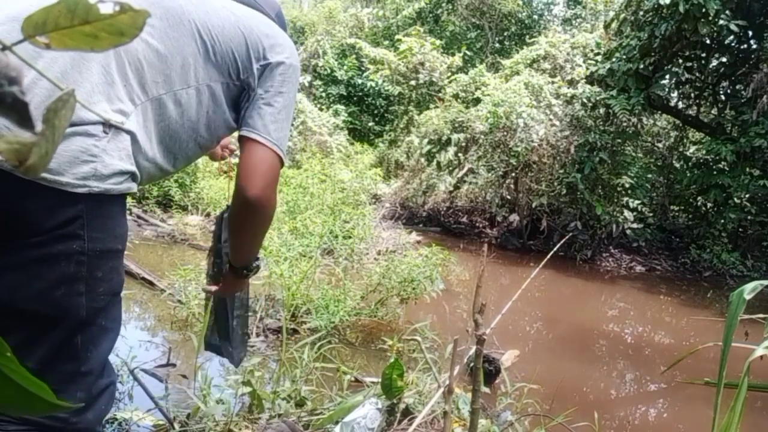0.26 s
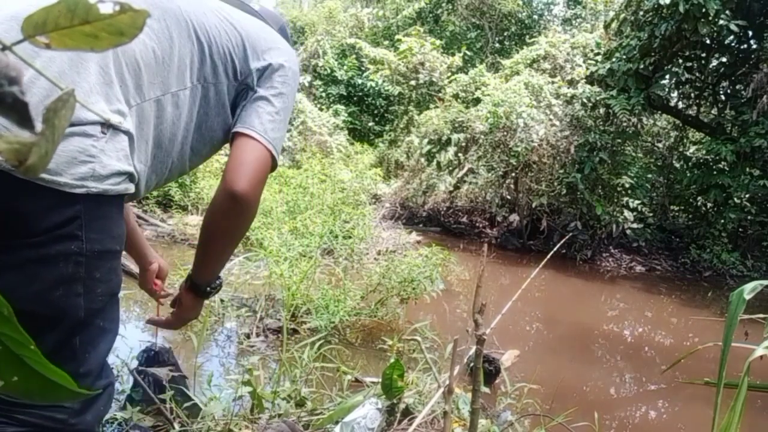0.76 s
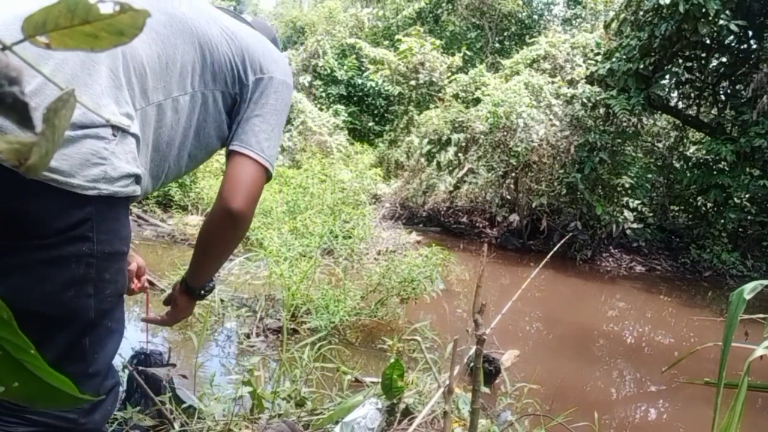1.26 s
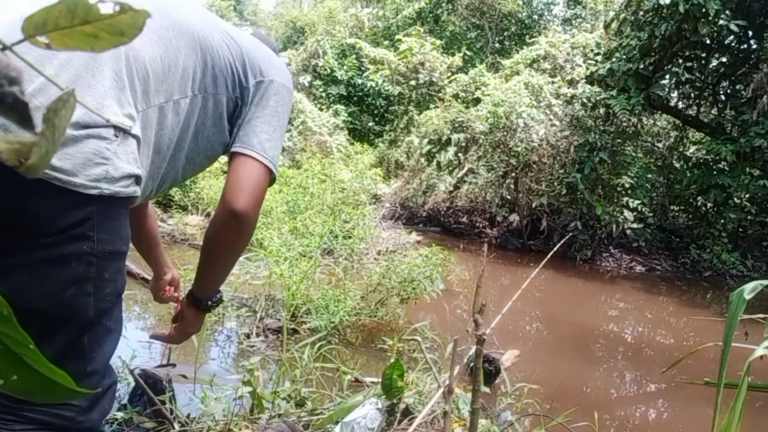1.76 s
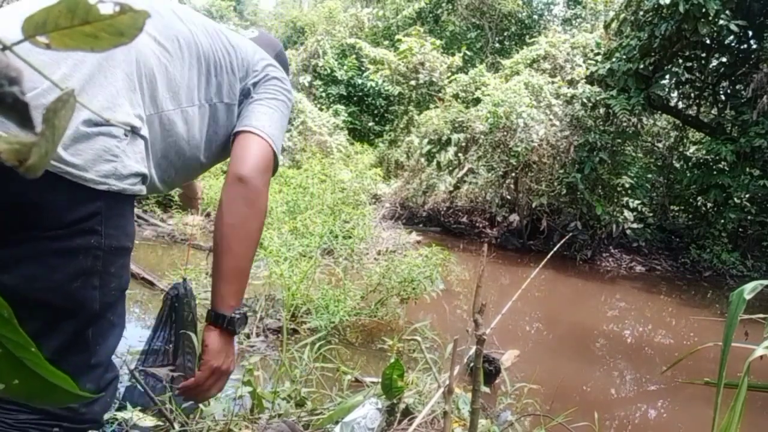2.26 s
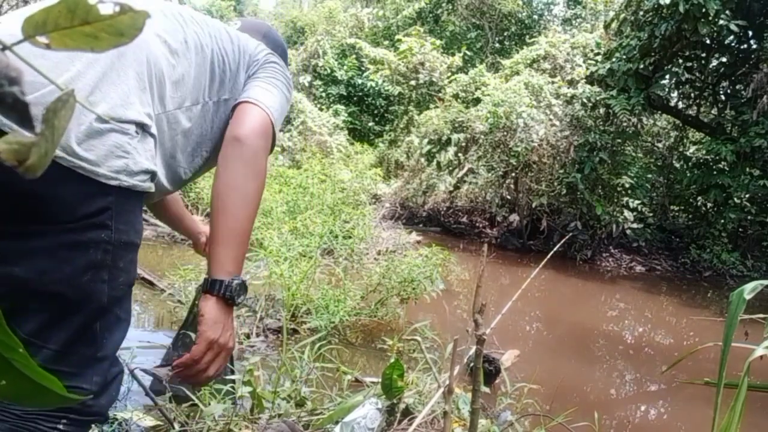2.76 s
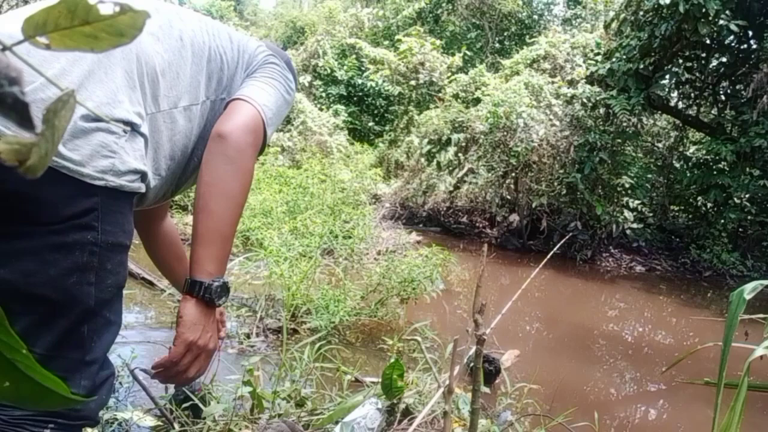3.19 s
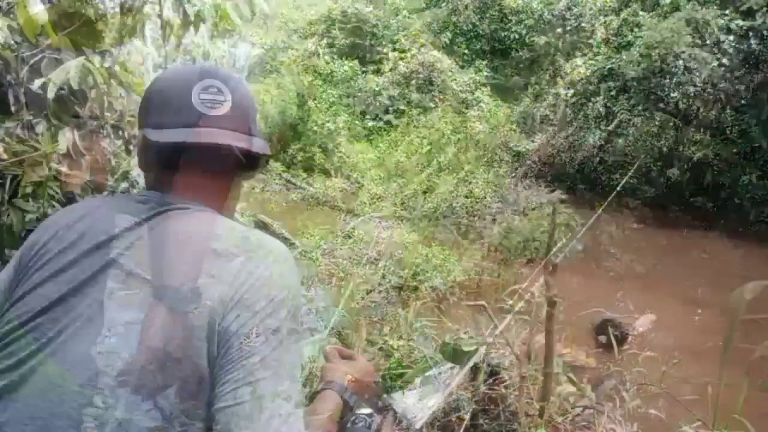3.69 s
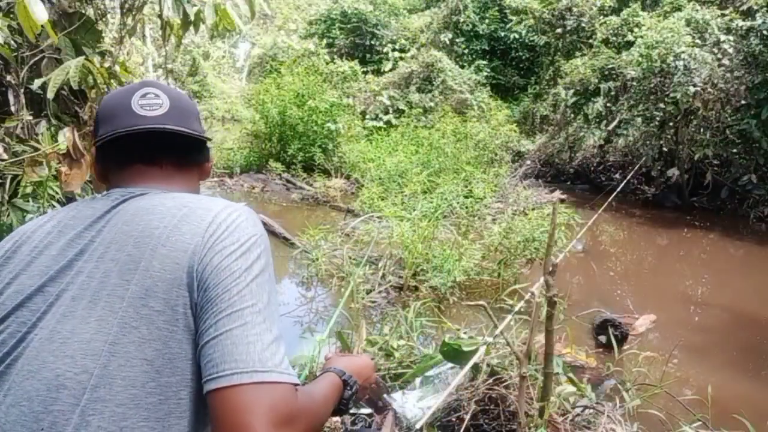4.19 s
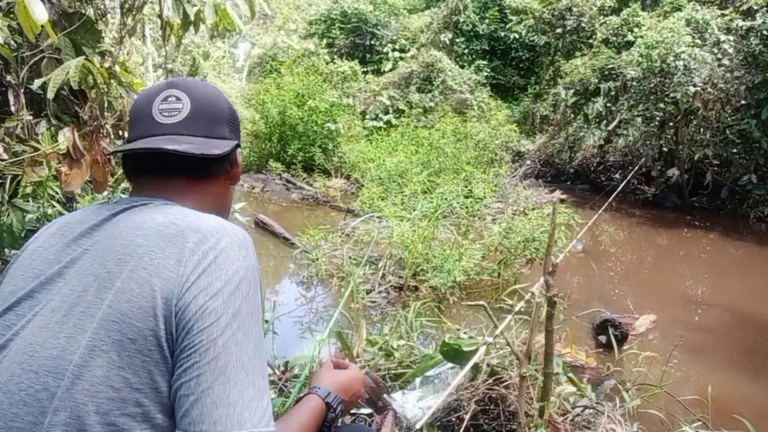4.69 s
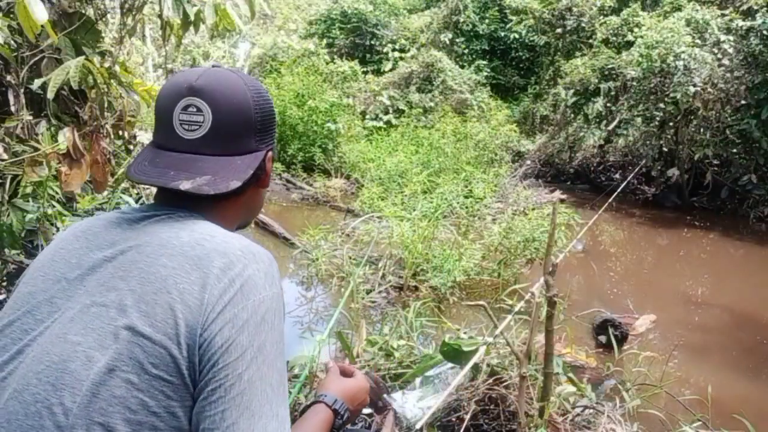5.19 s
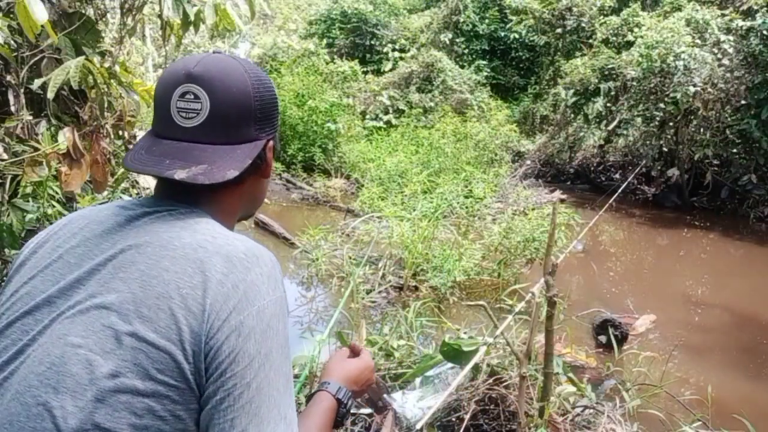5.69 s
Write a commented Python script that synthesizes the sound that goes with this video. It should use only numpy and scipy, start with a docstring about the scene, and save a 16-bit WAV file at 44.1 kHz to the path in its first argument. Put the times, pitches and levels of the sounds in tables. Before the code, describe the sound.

Steady high cicada hiss and a rasping katydid by a forest creek; a mesh trap drips, gurgles and slaps the water, then leaves rustle and a stem crackles.

```python
"""At the edge of a forest creek, close to the microphones, a mesh fish trap is dipped and lifted.
Water made of damped rings and shaped noise splashes, trickles and bubbles, with one big slap.
All round, flickering noise bands hiss as cicadas; on the left a katydid rasps two bouts of pulsed noise.
Far off a bird whistles rising sine notes, and a light breeze of low noise rumbles.
Leaves rustle in clumped grains; later come hollow gulps of fluttering tone and a crackling stem."""
import sys
import numpy as np
from scipy import signal
from scipy.fft import rfft, irfft, next_fast_len
from scipy.io import wavfile
from scipy.ndimage import map_coordinates

SR = 44100
rng = np.random.default_rng(int(sys.argv[2]) if len(sys.argv) > 2 else 0)


def dump_mix(stems):
    """Bounce the given channels to the path in sys.argv[1] as a 16-bit WAV at rate SR."""
    frames = np.atleast_2d(stems).T  # one column per channel
    limited = np.clip(frames, -1, 1)  # hard clip at full scale
    pcm = np.round(limited * 32767).astype(np.int16)
    wavfile.write(sys.argv[1], SR, pcm)


N = 262350  # samples in the scene


def amp(db):
    """Decibels to gain."""
    return 10 ** (np.asarray(db) / 20)


def unit(x):
    """Scaled to rms 1."""
    return x / np.sqrt(np.mean(x ** 2) + 1e-20)


def along(points, hz):
    """Interpolate (frequency, value) points on a log frequency axis."""
    f, v = np.transpose(points)
    return np.interp(np.log(hz + 1), np.log(f + 1), v)


def curves(rows):
    """One value per sample for each column after the time."""
    s, *cols = np.transpose(rows)
    return [np.interp(np.arange(N) / SR, s, c) for c in cols]


def wobble(rate, size=N):
    """A smooth random curve, rate knots a second."""
    knots = rng.standard_normal(int(size * rate / SR) + 4)
    return map_coordinates(knots, [np.arange(size) * rate / SR])


def filtered(x, response):
    """x with its spectrum multiplied by a function of frequency."""
    size = x.shape[-1]
    m = next_fast_len(size + 8192)
    return irfft(rfft(x, m) * response(np.fft.rfftfreq(m, 1 / SR)), m)[..., :size]


def coloured(x, spectrum):
    """x with a spectrum that falls off steeply beyond its ends, at rms 1."""
    low, high = spectrum[0][0], spectrum[-1][0]

    def response(hz):
        skirts = np.minimum(1, hz / low) ** 4 * np.minimum(1, high / (hz + 1)) ** 8
        return amp(along(spectrum, hz)) * skirts
    return unit(filtered(x, response))


def noise(alike, size=N):
    """White stereo noise; alike is the share of power common to both channels."""
    alike = np.clip(alike, 0, 1)
    shared = np.sqrt(alike) * rng.standard_normal(size)
    return shared + np.sqrt(1 - alike) * rng.standard_normal((2, size))


def crackle(alike, spiky_db, size=N):
    """Noise broken into grains of about a millisecond."""
    return unit(noise(alike, size) * amp(spiky_db * wobble(1100, size)))


def droplets(rate, spread_db, cycles, size=N):
    """A stereo shower of tiny damped rings, rate a second, each of its own pitch, size and side."""
    u = rng.random((int(rate * size / SR), 4))  # random time, pitch, size and side
    t = np.arange(SR // 300) / SR
    hz = 600 * 25 ** u[:, 1:2]
    life = np.minimum(cycles / hz, t[-1] / 3)  # decay time constant
    strength = amp(-spread_db * np.log(np.maximum(u[:, 2:3], .02))) * np.sqrt(hz / life)
    rings = strength * np.exp(-t / life) * np.sin(2 * np.pi * hz * t)
    at = ((u[:, :1] * size).astype(int) + np.arange(len(t))).ravel()
    side = np.pi * (u[:, 3:] * .8 - .15)
    gains = (np.cos(side), np.sin(side))
    return unit(np.array([np.bincount(at, (rings * g).ravel(), size)[:size] for g in gains]))


def burst(t, rise, t60):
    """An envelope that rises from time 0 and dies away."""
    t = np.maximum(t, 0)
    return amp(-60 * t / t60) * (1 - np.exp(-t / rise))


def swell(t, rise, t60):
    """An envelope that grows to its peak at time 0 and dies away."""
    log_gain = np.minimum(t / rise, -np.log(1000) * t / t60)
    return np.exp(np.maximum(-20, log_gain))


def pan(db):
    """Left and right gains for a level difference, left minus right."""
    return amp(np.array([[db], [-db]]) / 2)


def add(track, s, sound):
    """Mix a sound into a track from time s."""
    part = track[..., max(0, round(s * SR)):][..., :sound.shape[-1]]
    part += sound[..., :part.shape[-1]]


# echo among the trees: (frequency [Hz], t60 [s])
FOREST_T60 = [(200, 0.073), (2000, 0.4), (8000, 0.33), (16000, 0.46)]


def forest(x):
    """Diffuse echo from trunks and leaves: noise that decays at its own rate in each band."""
    hz, t, z = signal.stft(rng.standard_normal((2, SR // 2)), SR, nperseg=256)
    decay = amp(-60 * t / along(FOREST_T60, hz)[:, None])
    tail = signal.istft(z * decay, SR, nperseg=256)[1]
    return signal.fftconvolve(np.atleast_2d(x), tail / np.linalg.norm(tail[0]), axes=1)[:, :N]


# breeze rumble: (time [s], level [dB])
BREEZE_LEVEL = [(0, -81), (.5, -74), (1.5, -72.5), (2.6, -67), (3.2, -77.5), (3.65, -76.5), (3.9, -83.5),
                (5.95, -80)]
# its spectrum: (frequency [Hz], relative level [dB per Hz])
RUMBLE_SPECTRUM = [(25, -27.5), (45, -17), (70, -1.5), (100, -2), (145, -2), (200, -14), (400, -32)]
# faint wash of the forest: (time [s], level [dB])
WASH_LEVEL = [(0, -75.5), (3.3, -78), (3.85, -82), (4.1, -70.5)]
# its spectrum: (frequency [Hz], relative level [dB per Hz])
WASH_SPECTRUM = [(200, 8.5), (500, 4), (1150, 0.5), (1800, 1.5), (2800, -3.5), (4500, -4.5), (6000, -29.5),
                 (12000, -35)]
# stirring leaves: (time [s], level [dB])
LEAVES_LEVEL = [(0, -100), (1.8, -91.5), (3.2, -83), (5.2, -83.5)]
# their spectrum: (frequency [Hz], relative level [dB per Hz])
LEAVES_SPECTRUM = [(900, -4), (1800, 7), (3000, 8.5), (4200, 4), (5800, -15.5), (11000, -19.5)]
DEEP_DB = -85.5  # ever-present rumble of the air


def background():
    """A light breeze rumbles and stirs leaves under the faint wash of the forest."""
    rumble_db, = curves(BREEZE_LEVEL)
    wash_db, = curves(WASH_LEVEL)
    leaf_db, = curves(LEAVES_LEVEL)
    rumble = unit(coloured(noise(0.52), RUMBLE_SPECTRUM) * amp(1.6 * wobble(17)))
    deep = coloured(noise(0.26), [(20, 0.0), (60, 0.5), (120, -10.5)])
    leaves = coloured(noise(0.084), LEAVES_SPECTRUM) * amp(0.73 * wobble(22))
    wash = coloured(noise(0.02), WASH_SPECTRUM)
    return amp(rumble_db) * rumble + amp(DEEP_DB) * deep + amp(wash_db) * wash + amp(leaf_db) * leaves


# cicada chorus, before a lift of 2 dB: (time [s], level [dB])
CHORUS_LEVEL = [(0.0, -47), (0.61, -45.5), (1.59, -47), (2.95, -45), (3.91, -48.5), (4.24, -44),
                (5.95, -45)]
# its main band: (frequency [Hz], relative level [dB per Hz])
CICADA_SPECTRUM = [(6100, -95), (6400, -50), (6900, -15.5), (7200, -9.5), (7440, 0), (7550, 4.5),
                   (7650, -0.5), (7760, 2.5), (7980, 1), (8250, -6), (8600, -13.5), (9000, -23.5),
                   (9600, -34), (10000, -63)]
# thin whine of far insects: (frequency [Hz], relative level [dB per Hz])
WHINE_SPECTRUM = [(9500, -49.5), (12000, -61.5), (14000, -1.5), (14800, 3.5), (15200, 19.5), (15550, 2.5),
                  (15900, -10)]
CHORUS_PAN_DB, WHINE_PAN_DB = -2.4, 4.5  # left minus right


def cicadas():
    """Many tymbals blur into a fluttering band, a little right; a thin whine an octave up leans left."""
    level_db, = curves(CHORUS_LEVEL)
    band = unit(coloured(noise(0.072), CICADA_SPECTRUM) * amp(0.51 * wobble(170)))
    whine = coloured(noise(.15), WHINE_SPECTRUM) * amp(1.8 * wobble(36))
    return amp(level_db + 2) * band * pan(CHORUS_PAN_DB) + amp(-64.5) * whine * pan(WHINE_PAN_DB)


# katydid bouts: (start [s], end [s], time of one chirp [s], chirp rate [1/s], tilt [dB per octave])
KATYDID_BOUTS = [(-.1, 1.93, .026, 19.77, 0), (4.597, 6.1, 4.615, 21.38, -6)]
# wing strokes of a chirp: (centre [chirp periods], half width [chirp periods], level [dB])
WING_STROKES = [(.105, .08, -2.3), (.34, .09, .6), (.585, .115, 1)]
# rasp of the wings: (frequency [Hz], relative level [dB per Hz])
WING_SPECTRUM = [(9600, -46.5), (10400, -19.5), (12000, -19), (13200, -9), (14400, 2), (15450, 5.5),
                 (15700, 4.5)]
CHIRP_DB, CHIRP_PAN_DB = -35.5, 10  # overall gain; left minus right
GAP_DB = -13  # scattered wash between strokes, relative to the song
CHIRP_SWAY_DB = .7  # slow swelling from chirp to chirp


def katydid():
    """On the left, each chirp is three rasping wing strokes; leaves scatter a weak wash into the gaps."""
    t, song = np.arange(N) / SR, np.zeros((2, N))
    for start, end, first, rate, tilt in KATYDID_BOUTS:
        cycle = (t - first) * rate % 1
        strokes = np.zeros(N)
        for centre, width, db in WING_STROKES:
            strokes += amp(db) * np.exp(-np.abs((cycle - centre) / width) ** 3)
        singing = np.clip((t - start) / .004, 0, 1) * np.clip((end - t) / .02 + 1, 0, 1)
        spectrum = [(hz, db + tilt * np.log2(hz)) for hz, db in WING_SPECTRUM]
        rasp = coloured(crackle(0.047, spiky_db=-0.45), spectrum)
        uneven = amp(0.62 * wobble(45) + CHIRP_SWAY_DB * wobble(10))
        song += singing * np.hypot(strokes * uneven, amp(GAP_DB)) * rasp
    return amp(CHIRP_DB) * song * pan(CHIRP_PAN_DB)


def whistle(length, last_hz, slur, hoarse):
    """One slightly hoarse note that swells and fades as it slurs up to its pitch."""
    u = np.linspace(0, 1, int(length * SR))
    hz = last_hz * (1 - slur * np.exp(-(u / .39) ** 2)) * (1 + hoarse * wobble(300, len(u)))
    return np.abs(np.sin(np.pi * u)) ** 0.61 * np.sin(2 * np.pi * np.cumsum(hz) / SR)


# short level peeps and low coos, before the direct and echo gains: (start [s], level [dB], pitch [Hz])
PEEP_ROWS = [(.02, -66.5, 347), (.16, -68, 812), (.355, -69, 1840), (0.421, -66, 345), (.78, -67, 1660),
             (1.41, -70.5, 1715), (2.04, -65, 1830), (3.63, -71, 1693), (3.839, -68.5, 1495),
             (4.264, -66, 1722), (4.431, -74.5, 1742)]
PEEP_S = 0.048  # length
SERIES_S, NOTE_GAP_S, NOTE_S = 1.02, .265, .175  # first note's start, note spacing, note length
SERIES_TOP_HZ, SERIES_CLIMB_HZ = 2997, 379.3  # pitch the series climbs towards, and by how much
SERIES_DB, SERIES_SWELL_DB = -56, 12  # level it climbs towards before the gains, and by how much
SERIES_SETTLE, NOTE_SLUR = .6, .06  # share of climb left after each note; upslur, share of pitch
HOARSE, WAVER_DB = .02, 1.5  # fast random pitch flutter, share of pitch; unsteady level


def bird(count=5):
    """Far, evenly spaced whistles climb and swell; peeps and lower whistles join, blurred by the trees."""
    song = np.zeros(N)
    for k in range(count):
        left = SERIES_SETTLE ** k  # share of the climb still to come
        note = whistle(NOTE_S, SERIES_TOP_HZ - SERIES_CLIMB_HZ * left, NOTE_SLUR, HOARSE)
        add(song, SERIES_S + k * NOTE_GAP_S, amp(SERIES_DB - SERIES_SWELL_DB * left) * note)
    for s, db, hz in PEEP_ROWS:
        add(song, s, amp(db) * whistle(PEEP_S, hz, 0, HOARSE))
    song = song * amp(WAVER_DB * wobble(30))
    return amp(-7.5) * song + amp(-1.5) * forest(song) + low_whistles()


# single lower whistles: (start [s], length [s], last pitch [Hz], level [dB])
LOW_WHISTLES = [(0.427, 0.145, 2115, -52), (2.025, .2, 2120, -61)]
WHISTLE_SLUR, WHISTLE_HOARSE = 0.1, .014  # upslur and flutter, shares of the pitch
WHISTLE_SWELL_DB, WHISTLE_ECHO_DB = 16.5, -6  # growth over the note; echo level


def low_whistles():
    """A nearer bird glides up in one smooth note that grows louder towards its end."""
    song = np.zeros(N)
    for s, length, hz, db in LOW_WHISTLES:
        note = whistle(length, hz, WHISTLE_SLUR, WHISTLE_HOARSE)
        add(song, s, amp(db + np.linspace(-WHISTLE_SWELL_DB, 0, len(note))) * note)
    return song + amp(WHISTLE_ECHO_DB) * forest(song)


# hits on the water: (time [s], level [dB], t60 [s], falling drops [dB], low body [dB],
# left minus right [dB]); drops and body are relative to the hit
SPLASH_ROWS = [(0.592, -36.5, 0.09, 1, -29, -0.5), (.612, -41, .1, -5.5, -32, .5),
               (1.997, -33.5, 0.019, -19.5, -28, -2.5), (2.53, -27, 0.032, -16.5, -29, 1.5),
               (2.6513, -18, 0.021, -25.5, 1.5, -1.5), (2.6532, -16, 0.053, -16.5, -17.5, 2.5),
               (2.9594, -32.5, 0.065, -11.5, -23.5, -1.5)]
# thrown droplets: (frequency [Hz], relative level [dB per Hz])
SPRAY_SPECTRUM = [(400, -35), (1000, -14), (2000, -1.5), (2900, 3), (4200, 0.5), (6000, -0.5), (8000, 7.5),
                  (11000, 0), (15500, 1.5)]
# low push of the water: (frequency [Hz], relative level [dB per Hz])
BODY_SPECTRUM = [(90, -22.5), (150, -11), (200, -17), (280, -3.5), (360, -13.5), (480, 0), (700, -3.5),
                 (1200, -3.5), (2000, 0.5), (4000, -16.5)]
SPLASH_RISE_S = .0005
LEAD_DB, LEAD_S = -14.5, 0.01  # mesh meets the water around the hit: relative level, swell time
FALLBACK_S, FALLBACK_T60_S = 0.006, 0.17  # thrown drops land again: delay, dying time
FALLBACK_CLUMP_DB = 2.5  # how unevenly they land


def splashes():
    """Each hit throws a spray over a low push and the drops fall back; small splashes lack deep bass."""
    out, t = np.zeros((2, N)), np.arange(-SR // 25, SR // 4) / SR
    for s, db, t60, fall_db, body_db, pan_db in SPLASH_ROWS:
        drops = droplets(6000, spread_db=3, cycles=1.2, size=len(t))
        spray = coloured(noise(0, len(t)) + drops, SPRAY_SPECTRUM)
        body = coloured(noise(0.85, len(t)), BODY_SPECTRUM)
        lead = amp(LEAD_DB) * np.exp(-np.abs(t) / LEAD_S)
        landing = amp(fall_db + FALLBACK_CLUMP_DB * wobble(260, len(t)))
        fallback = landing * burst(t - FALLBACK_S, SPLASH_RISE_S, FALLBACK_T60_S)
        strength = np.sqrt(lead ** 2 + burst(t, SPLASH_RISE_S, t60) ** 2 + fallback ** 2)
        add(out, s + t[0], amp(db) * strength * (spray + amp(body_db) * body) * pan(pan_db))
    return signal.sosfilt(signal.butter(2, 140, "highpass", fs=SR, output="sos"), out)


# twigs and drops: (time [s], level [dB], pitch [Hz], t60 [s])
TICK_ROWS = [(.593, -41.5, 1390, 0.047), (0.633, -52, 3050, .03), (.647, -50, 2150, .03),
             (.782, -46, 6100, .025), (.796, -54, 5300, .02), (.798, -53.5, 1650, 0.071),
             (.829, -53, 5500, 0.027), (.841, -48, 5900, .02), (2.336, -33, 3680, 0.02),
             (2.638, -33, 1200, .01), (2.6565, -29, 3000, .08), (2.9043, -41.5, 3880, .025),
             (2.9587, -34.5, 2020, 0.046), (3.0819, -45, 3260, 0.026), (3.477, -61.5, 4030, 0.018),
             (3.655, -58, 3980, 0.013), (4.984, -49.5, 4000, .025), (5.36, -51, 3480, 0.032),
             (5.808, -45, 2800, 0.068), (5.809, -48, 1950, .05), (5.822, -46, 1900, 0.054),
             (5.851, -56, 3850, .03), (5.885, -53, 3800, 0.031)]


def ticks():
    """A tick is a short, rough ring with a little bright noise."""
    out, t = np.zeros((2, N)), np.arange(SR // 20) / SR
    for s, db, hz, t60 in TICK_ROWS:
        ring = np.sin(2 * np.pi * hz * t + 0.9 * wobble(900, len(t)))
        bright = amp(-12.5) * coloured(noise(.3, len(t)), SPRAY_SPECTRUM)
        add(out, s, amp(db) * burst(t, .0004, t60) * (ring + bright))
    return out


# bank plants, before a lift of 1 dB: (peak time [s], level [dB], swell [s], t60 [s],
# centre [Hz], width [octaves])
RUSTLE_ROWS = [(.76, -58.5, 0.017, 0.31, 2800, 0.97), (.785, -52, 0.014, 0.12, 6100, .2),
               (0.839, -54.5, .018, 0.1, 5800, 0.27), (.84, -68, 0.023, .2, 1970, 0.32),
               (1.85, -67.5, 0.016, 0.25, 4930, 0.38), (3.486, -66.5, 0.028, 0.27, 6490, 1.8),
               (3.66, -69, 0.016, .3, 6500, 1.2), (3.988, -61, 0.0046, 0.22, 2740, .05),
               (4.016, -62.5, 0.0087, .14, 1470, 0.44), (4.075, -59, 0.013, 0.18, 1000, 0.38),
               (4.112, -55, 0.0051, 0.12, 1140, .55), (4.08, -66, 0.041, 0.28, 3430, 0.82),
               (4.278, -63.5, .004, 0.1, 2330, 0.096), (4.92, -52.5, 0.024, 0.16, 3280, 1.2),
               (5.147, -61, 0.011, 0.17, 2700, 0.48), (5.365, -61, .014, 0.19, 3640, 0.53),
               (5.825, -51.5, 0.011, 0.21, 1920, 0.12), (5.82, -52, 0.008, 0.19, 2680, 0.16),
               (5.825, -60.5, 0.016, 0.3, 5400, 0.86), (5.87, -65, .04, 0.2, 5750, .06),
               (5.89, -62, 0.036, .2, 3680, 0.083), (5.885, -62, .015, 0.12, 2220, 0.26)]
LEAF_RING_DB = 4  # how unevenly the leaves of one rustle ring across the spectrum


def rustles(count=90):
    """Leaves brush past in swells of clumped grains, each time ringing at other pitches."""
    out, t = np.zeros((2, N)), np.arange(-SR // 10, SR // 4) / SR
    for s, db, rise, t60, centre_hz, octaves in RUSTLE_ROWS:
        ring_db = LEAF_RING_DB * rng.standard_normal(count)

        def band(hz):
            ringing = amp(np.interp(hz, np.linspace(0, SR / 2, count), ring_db))
            return ringing / (1 + (np.log2((hz + 1) / centre_hz) / octaves) ** 4)
        grains = droplets(2000, spread_db=2, cycles=1.8, size=len(t)) + amp(-2) * noise(0.14, len(t))
        clumps = amp(1.6 * wobble(190, len(t)))
        brush = unit(filtered(grains * clumps, band))
        add(out, s + t[0], amp(db + 1) * swell(t, rise, t60) * brush)
    return out * pan(-0.57)


def burble(rate, pitch_hz, spread_db):
    """A random stream of small bubbles, each rising a little in pitch as it dies."""
    out, t = np.zeros(N), np.arange(SR // 25) / SR
    for when, pitch, size in rng.random((int(rate * N / SR), 3)):
        hz = pitch_hz * 4 ** (pitch - .5)
        envelope = np.exp(-hz * t / 9) * (1 - np.exp(-hz * t))
        ring = envelope * np.sin(2 * np.pi * hz * t * (1 + 2 * t))
        add(out, when * N / SR, amp(spread_db * size) * ring)
    return unit(out)


# water running off the mesh, before a lift of 4.5 dB: (peak time [s], level [dB], swell [s],
# t60 [s], low slosh relative to the surge [dB])
SURGE_ROWS = [(2.03, -66, 0.025, 0.56, -32), (2.16, -69.5, 0.037, 0.54, -36), (2.29, -64.5, 0.051, 1, -34),
              (2.47, -51, 0.028, 0.74, -29), (2.55, -48, 0.027, 0.75, -25), (2.67, -51.5, 0.053, 0.43, -16),
              (2.807, -50.5, 0.052, 0.38, -21), (2.992, -51, 0.018, .3, -15.5),
              (3.084, -56.5, 0.019, 0.11, -39)]
# pattering drops: (frequency [Hz], relative level [dB per Hz])
TRICKLE_SPECTRUM = [(300, -24), (550, -19), (900, -23), (1400, 2), (2400, 3), (3400, 4.5), (6000, 1.5),
                    (9000, 3), (15500, -8.5)]
# low slosh: (frequency [Hz], relative level [dB per Hz])
SLOSH_SPECTRUM = [(300, -13.5), (480, -0.5), (700, 6.5), (1100, -13)]


def runoff():
    """Water leaves the lifted mesh in surges: drops patter in spurts, slosh and stir up small bubbles."""
    t = np.arange(N) / SR
    flow, heave = np.zeros(N), np.zeros(N)
    for s, db, rise, t60, slosh_db in SURGE_ROWS:
        surge = amp(db) * swell(t - s, rise, t60)
        flow = np.hypot(flow, surge)
        heave = np.hypot(heave, amp(slosh_db) * surge)
    patter = coloured(droplets(1900, spread_db=2.5, cycles=3.5) + noise(0.22), TRICKLE_SPECTRUM)
    spurts = amp(1.5 * wobble(45))
    fizz = amp(-6.5) * burble(300, pitch_hz=3540, spread_db=22.5)
    low_fizz = amp(-18.5) * burble(240, pitch_hz=1600, spread_db=23.5)
    trickle = spurts * patter + fizz + low_fizz
    slosh = coloured(rng.standard_normal(N), SLOSH_SPECTRUM)
    return amp(4.5) * (flow * trickle + heave * slosh) * pan(-1)


# the rising trap: (start [s], end [s], first pitch [Hz], last pitch [Hz])
GURGLE_SPAN = (2.24, 2.65, 1700, 950)
GURGLE_DB, GURGLE_SWELL_DB = -63.5, 10.5  # first bubbles before the lift in bubbles(); growth
GURGLE_PITCH_SPREAD, GURGLE_SPREAD_DB = 0.25, 3  # octaves and dB from bubble to bubble


def gurgle(count=36):
    """Rows (time [s], level [dB], pitch [Hz]) of bubbles growing deeper and louder as the trap comes up."""
    start, end, first_hz, last_hz = GURGLE_SPAN
    u = (np.arange(count) + rng.random(count)) / count
    size, pitch = rng.standard_normal((count, 2)).T
    hz = first_hz * (last_hz / first_hz) ** u * 2 ** (GURGLE_PITCH_SPREAD * pitch)
    level_db = GURGLE_DB + GURGLE_SWELL_DB * u + GURGLE_SPREAD_DB * size
    return list(zip(start + (end - start) * u, level_db, hz))


# the clearest bubbles and drips, before a lift of 4.5 dB: (time [s], level [dB], pitch [Hz])
BUBBLE_ROWS = [(2.252, -51.5, 1384), (2.259, -39.5, 1800), (2.268, -46, 1590), (2.305, -53, 1640),
               (2.378, -43, 1550), (2.409, -48.5, 1280), (2.415, -50, 1770), (2.453, -44.5, 1360),
               (2.462, -40.5, 793), (2.492, -44.5, 1280), (2.530, -47, 560), (2.566, -39, 1350),
               (2.579, -46.5, 876), (2.607, -46.5, 886), (2.620, -46, 550), (2.713, -51, 1690),
               (2.806, -48, 1347), (2.886, -53.5, 1454), (2.962, -45, 1372), (2.98, -48, 2030),
               (3.18, -43, 2327), (4.736, -58.5, 896), (4.737, -59.5, 1330)]
BUBBLE_T60_S, BUBBLE_DAMPING = 0.056, 0.38  # ring time at 1 kHz; power of pitch that shortens it


def bubbles():
    """Trapped air rings briefly and unsteadily at its own pitch; small, high bubbles die sooner."""
    out, t = np.zeros(N), np.arange(SR // 8) / SR
    for s, db, hz in list(BUBBLE_ROWS) + gurgle():
        t60 = BUBBLE_T60_S * (hz / 1000) ** -BUBBLE_DAMPING
        phase = 2 * np.pi * hz * t + 0.6 * wobble(250, len(t))
        add(out, s, amp(db + 4.5) * burst(t, .0012, t60) * np.sin(phase))
    return out * pan(-1)


# wet pops: (frequency [Hz], relative level [dB per Hz])
WET_SPECTRUM = [(700, -18.5), (1300, -1.5), (1800, 0.5), (3000, -0.5), (4500, -12)]
CHURN_DB, CHURN_SWELL_DB, CHURN_T60_S = -64.5, 8.5, .25  # first level, growth, dying time


def churn():
    """Water squeezes through the mesh in clumps of tiny wet pops that grow with the gurgle."""
    start, end = GURGLE_SPAN[:2]
    t = np.arange(N) / SR
    lift = np.clip((t - start) / (end - start), 0, 1)
    dying = amp(-60 * np.maximum(t - end, 0) / CHURN_T60_S)
    active = np.clip((t - start) / 0.009, 0, 1) * dying
    pops = coloured(droplets(1300, spread_db=4, cycles=3), WET_SPECTRUM)
    clumps = amp(3 * wobble(60))
    return amp(CHURN_DB + CHURN_SWELL_DB * lift) * active * clumps * pops


# air pocket under the big slap: (time [s], level [dB])
PLOP_AT = (2.652, -31)
# its modes: (frequency [Hz], relative level [dB], t60 [s])
POCKET_MODES = [(286, 1.5, 0.065), (484, -1.5, 0.06), (665, 3.5, 0.05), (1235, 4, .022)]


def plop():
    """The big slap traps a pocket of air that rings low and briefly."""
    out, t = np.zeros(N), np.arange(SR // 8) / SR
    s, level_db = PLOP_AT
    for hz, db, t60 in POCKET_MODES:
        add(out, s, amp(level_db + db) * burst(t, 0.0012, t60) * np.sin(2 * np.pi * hz * t))
    return out


# hollow gulps: (peak time [s], level [dB], pitch [Hz], half length [s])
GULP_ROWS = [(3.972, -59, 562, 0.011), (4.011, -51.5, 429, 0.022), (4.057, -48.5, 462, 0.006),
             (4.074, -49, 468, 0.015), (4.109, -33.5, 437, 0.0035), (4.122, -47, 475, 0.018),
             (4.179, -56.5, 410, 0.011), (4.265, -61.5, 420, 0.025), (4.401, -62, 424, 0.036),
             (4.645, -66.5, 445, 0.025), (4.779, -66, 438, 0.022), (4.965, -57.5, 472.5, 0.036),
             (5.089, -55, 432, 0.022), (5.096, -67.5, 588, 0.038), (5.1, -62, 216, 0.021)]
# their rough part: (frequency [Hz], relative level [dB per Hz])
RASP_SPECTRUM = [(130, -13.5), (220, -5), (330, -3), (580, 5.5), (760, -12), (1150, -12), (1600, -21),
                 (3000, -22)]
GULP_RASP_DB, GULP_FLUTTER_DB = -12, 2  # rough part relative to the tone; unsteady level


def gulps():
    """Soft hollow tones swell, flutter and sag in pitch over a low rasp."""
    out, t = np.zeros(N), np.arange(-SR // 10, SR // 10) / SR
    for s, db, hz, half in GULP_ROWS:
        phase = 2 * np.pi * hz * t * (1 - 0.5 * t) + 0.75 * wobble(117.6, len(t))
        rasp = coloured(rng.standard_normal(len(t)), RASP_SPECTRUM)
        tone = np.sin(phase) + amp(GULP_RASP_DB) * rasp
        level = amp(db + GULP_FLUTTER_DB * wobble(148.4, len(t)))
        add(out, s + t[0], level / np.cosh(np.pi / 2 * t / half) * tone)
    return out * pan(-3.5)


# crackles of a stem: (time [s], level [dB], tilt [dB per octave], t60 [s])
CRUNCH_ROWS = [(4.8965, -33, 2, 0.052), (4.908, -44, 0.5, 0.055), (4.9165, -40.5, 1, 0.08),
               (4.9235, -43, 0.5, 0.068), (4.933, -38, 1, .025), (4.9376, -38, -2, 0.036),
               (4.945, -46, -1.5, 0.099)]
# its fibres: (frequency [Hz], relative level [dB per Hz])
STEM_SPECTRUM = [(180, -27), (300, -5), (407, -4.5), (695, -5), (842, -21), (981, -1), (1470, -5),
                 (2390, 1), (3050, 1), (3370, -14), (3600, -2.5), (4350, -6.5), (5010, -30), (5480, -5),
                 (6300, -15.5), (11000, -11), (14500, -30)]
CRUNCH_RISE_S = 0.00057


def crunches():
    """A stem gives way in separate quick crackles, the last two duller."""
    out, t = np.zeros((2, N)), np.arange(SR // 6) / SR
    for s, level_db, tilt, t60 in CRUNCH_ROWS:
        spectrum = [(hz, db + tilt * np.log2(hz)) for hz, db in STEM_SPECTRUM]
        fibres = coloured(crackle(0.4, spiky_db=1.3, size=len(t)), spectrum)
        add(out, s, amp(level_db) * burst(t, CRUNCH_RISE_S, t60) * fibres)
    return out


LEFT_LAG_S = 0.00021  # near sounds reach the left microphone this much later


def scene():
    """Near sounds at the bank, their faint echo, and the forest around."""
    water = splashes() + runoff() + bubbles() + churn() + plop() + gulps()
    near = water + ticks() + rustles() + crunches()
    ears = np.array([[-1], [1]])  # left half a lag later, right half a lag earlier
    near = filtered(near, lambda hz: np.exp(1j * np.pi * hz * LEFT_LAG_S * ears))
    return near + amp(-16.5) * forest(near) + background() + cicadas() + katydid() + bird()


TOP_HZ = 15600  # band limit of the recorder


def record(dry):
    """The recorder keeps nothing above its band limit."""
    return filtered(dry, lambda hz: hz < TOP_HZ)


dry = scene()
out = record(dry)
dump_mix(out)
```